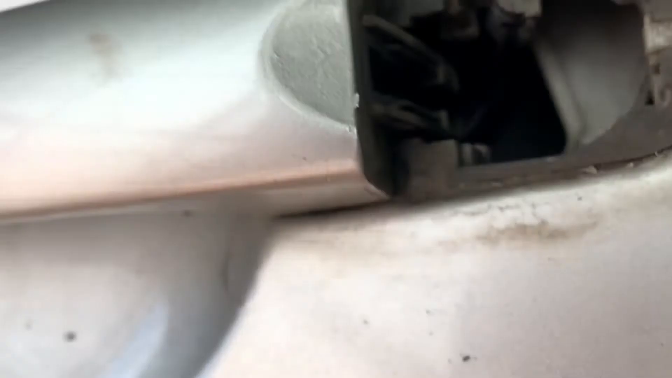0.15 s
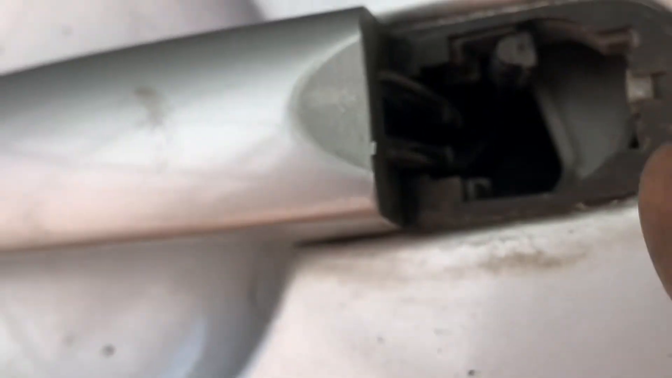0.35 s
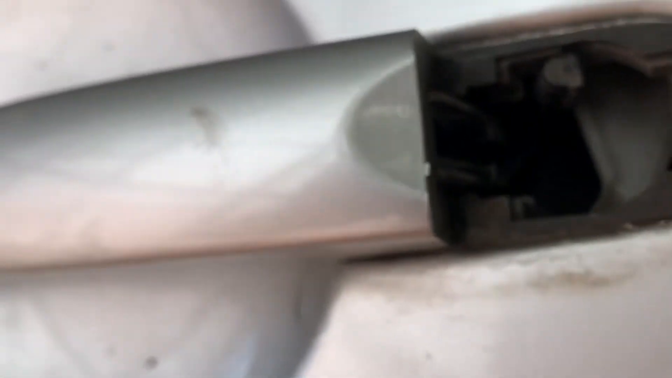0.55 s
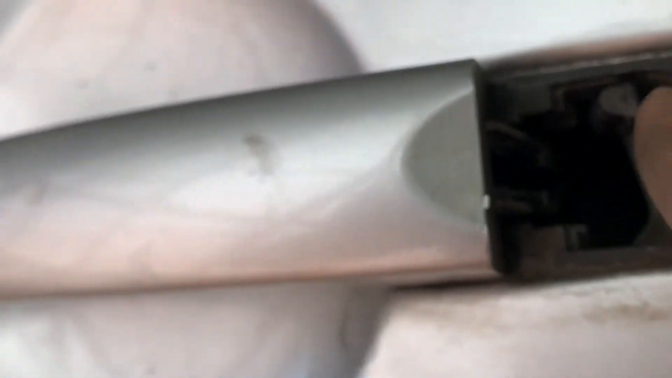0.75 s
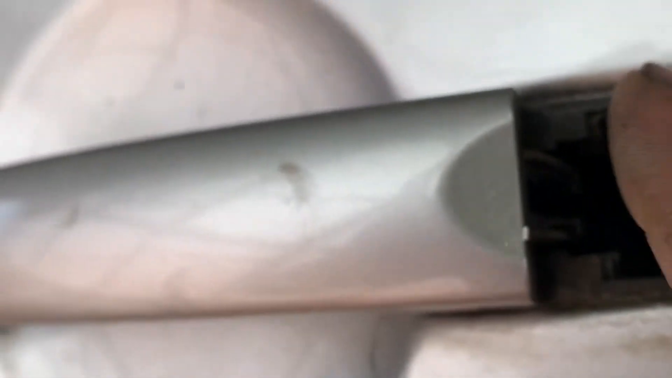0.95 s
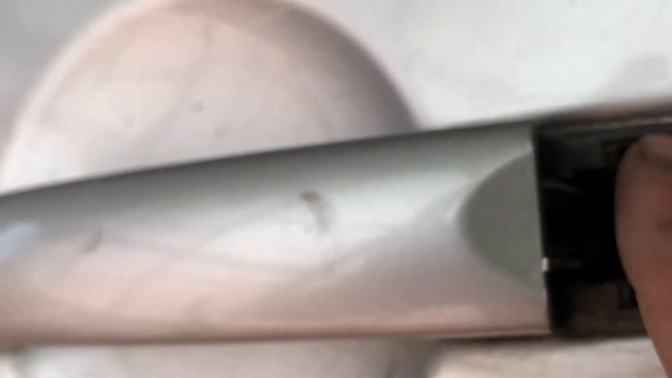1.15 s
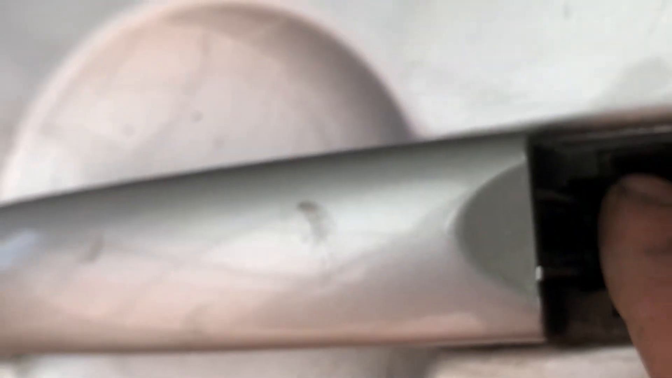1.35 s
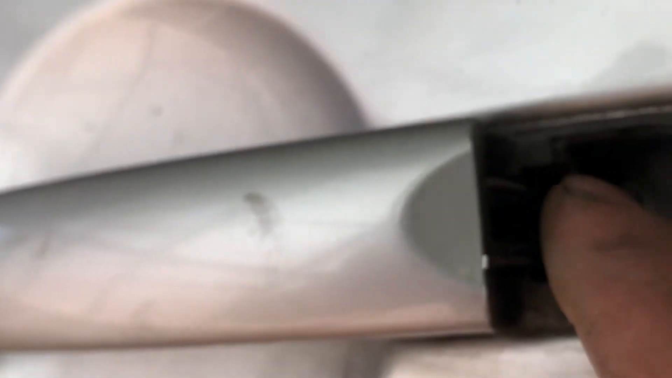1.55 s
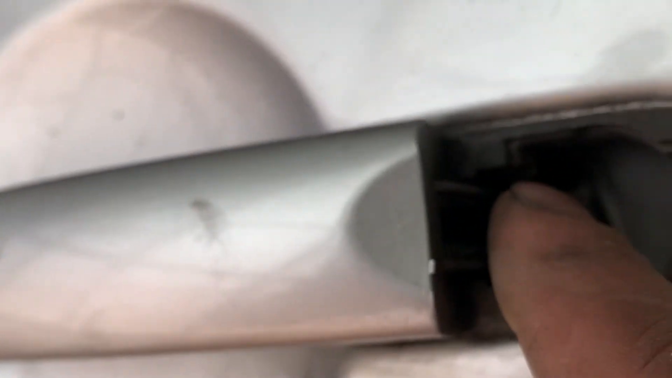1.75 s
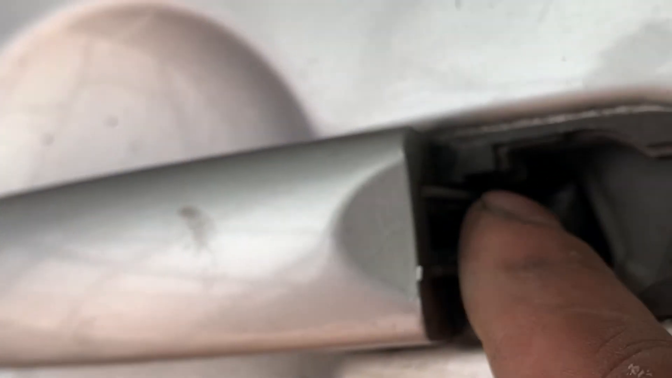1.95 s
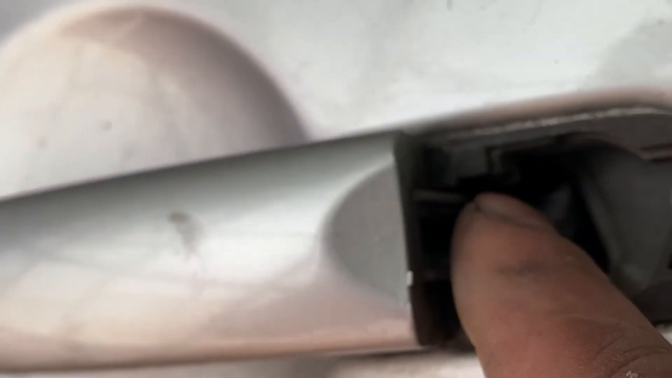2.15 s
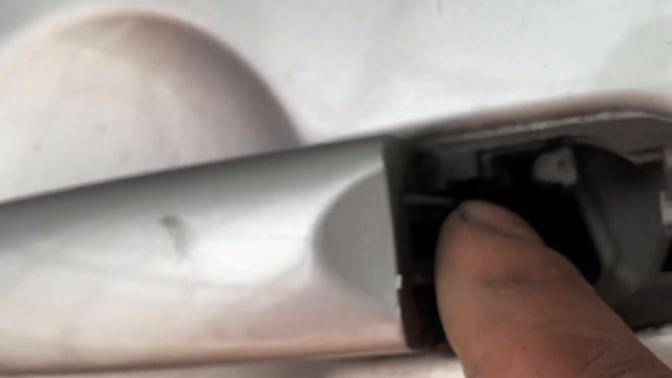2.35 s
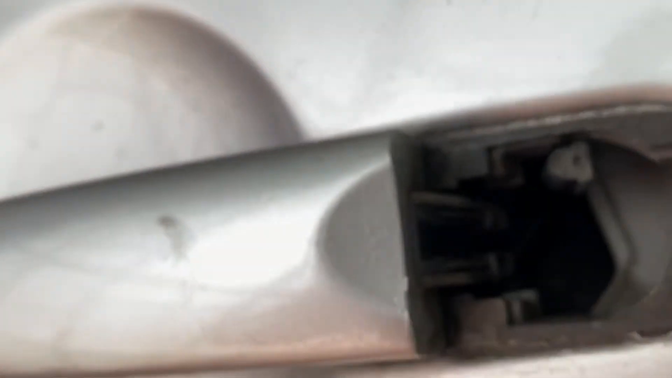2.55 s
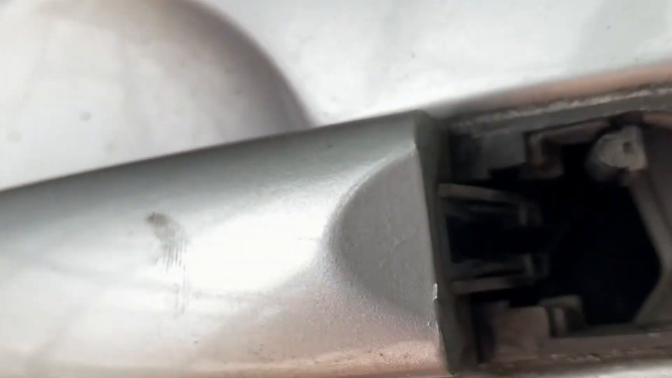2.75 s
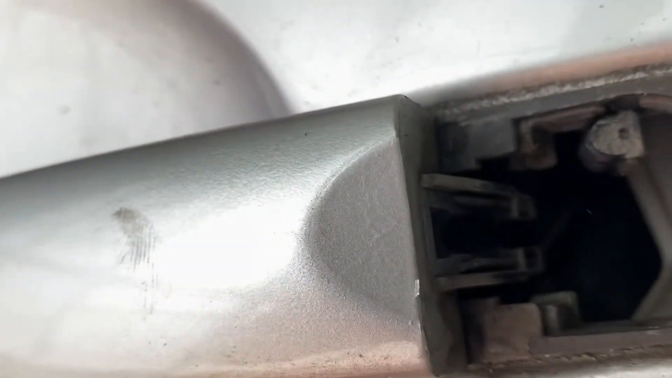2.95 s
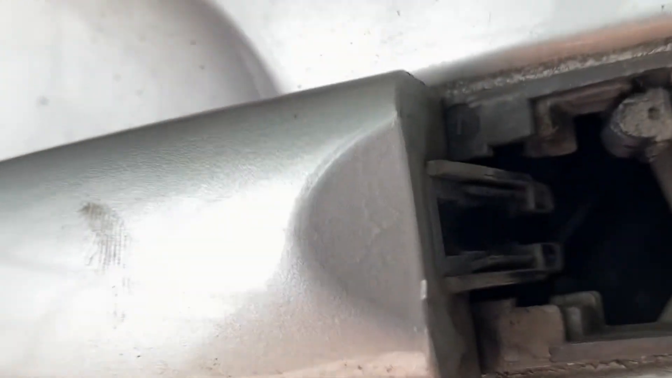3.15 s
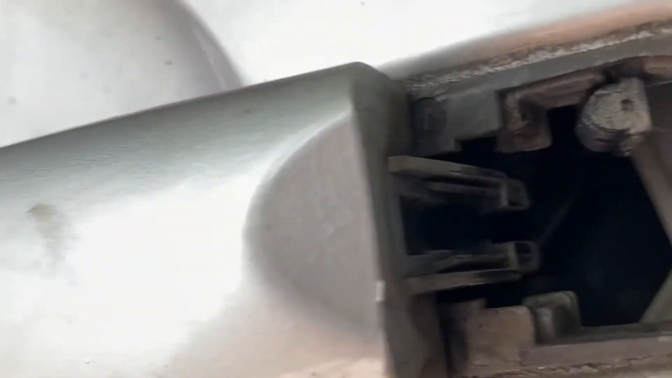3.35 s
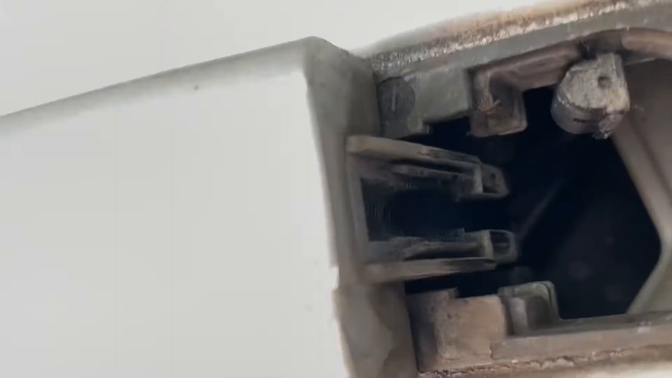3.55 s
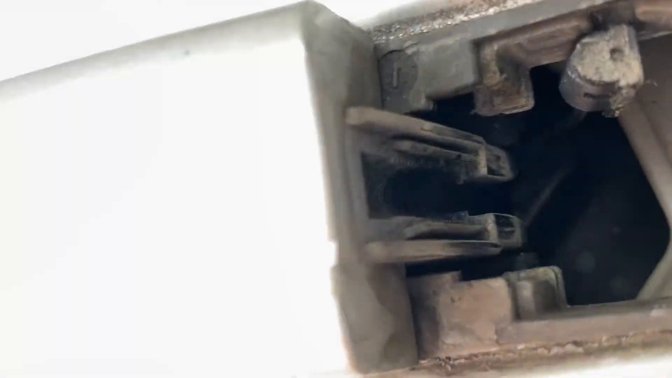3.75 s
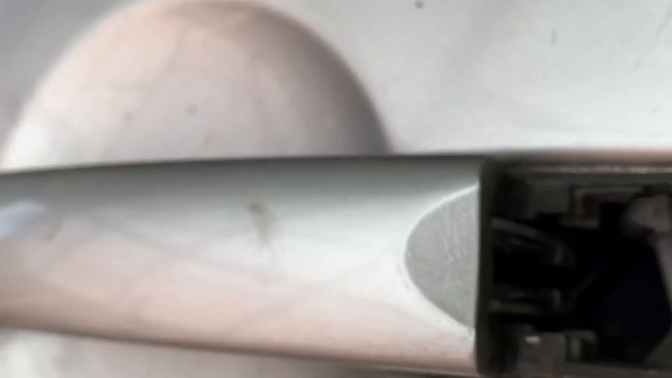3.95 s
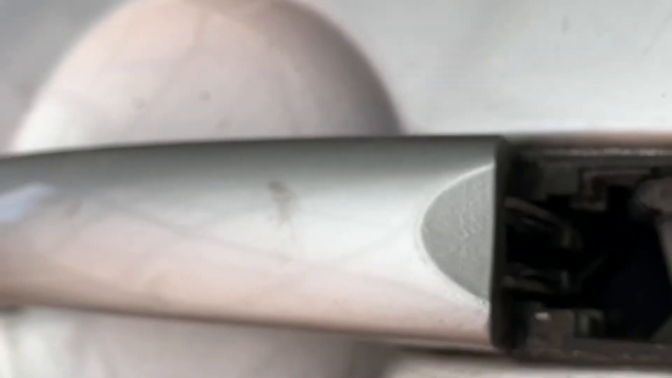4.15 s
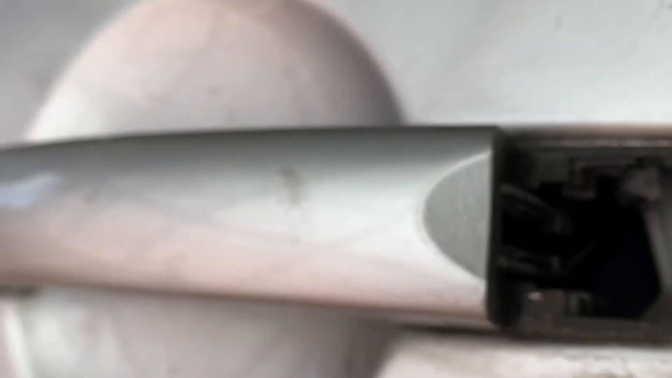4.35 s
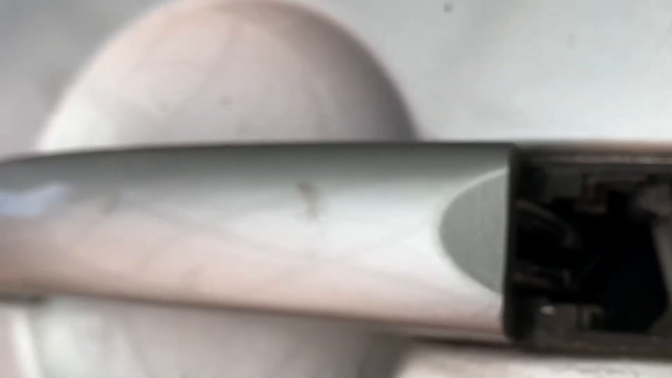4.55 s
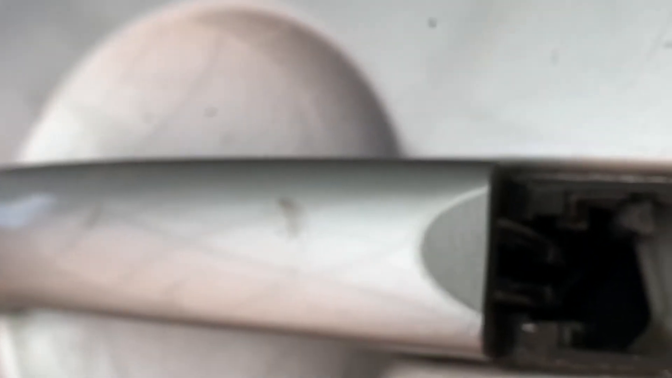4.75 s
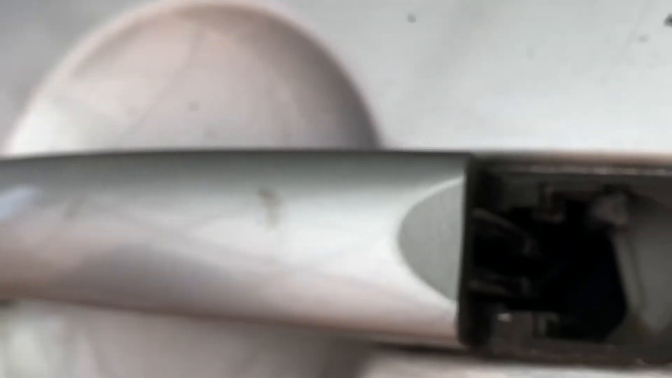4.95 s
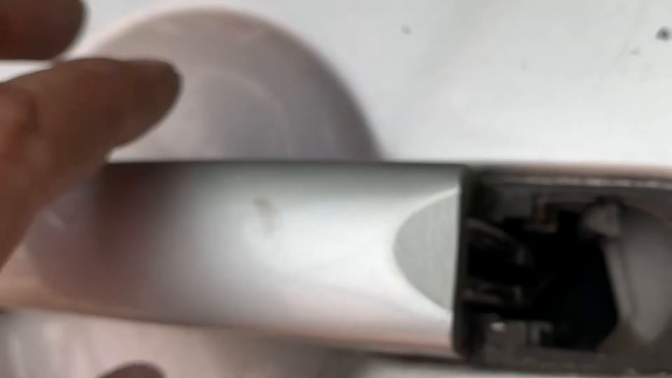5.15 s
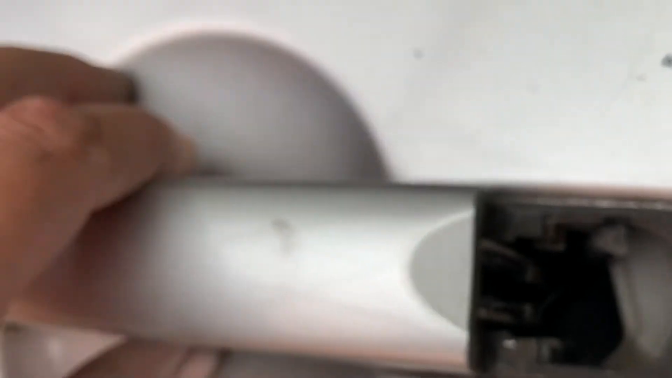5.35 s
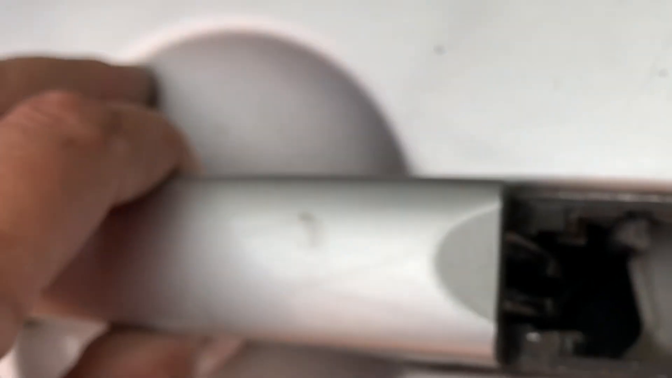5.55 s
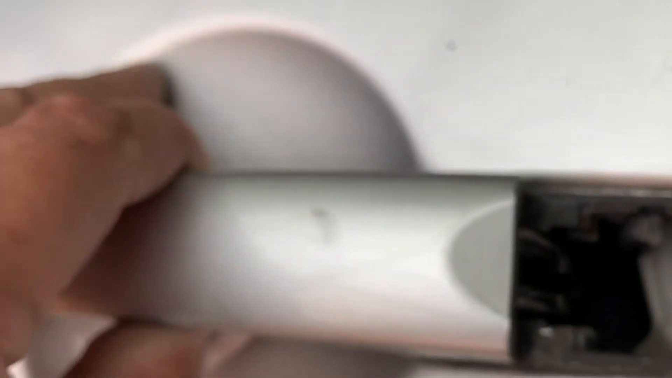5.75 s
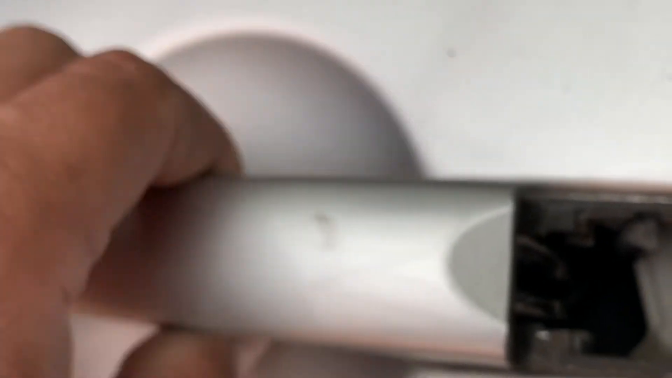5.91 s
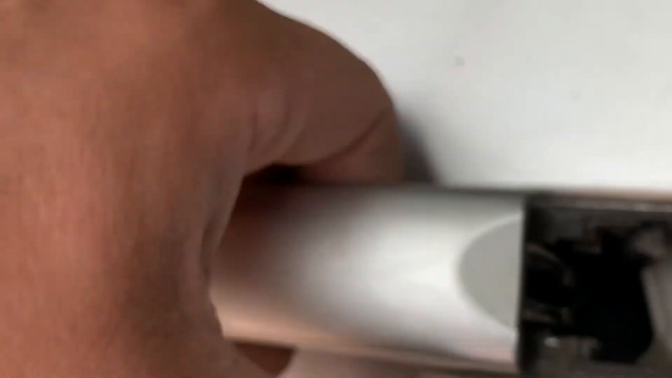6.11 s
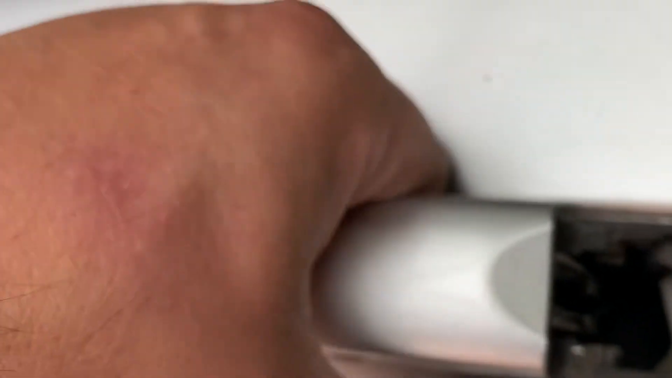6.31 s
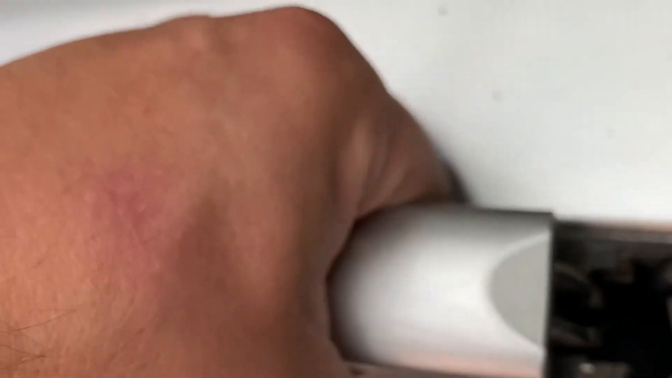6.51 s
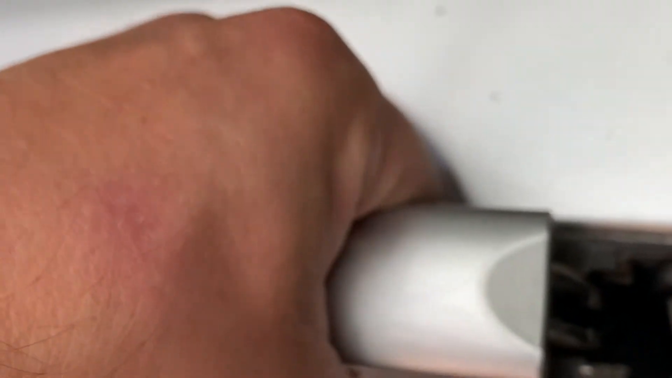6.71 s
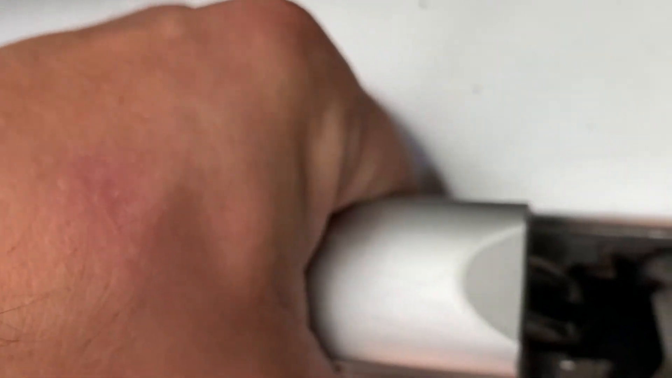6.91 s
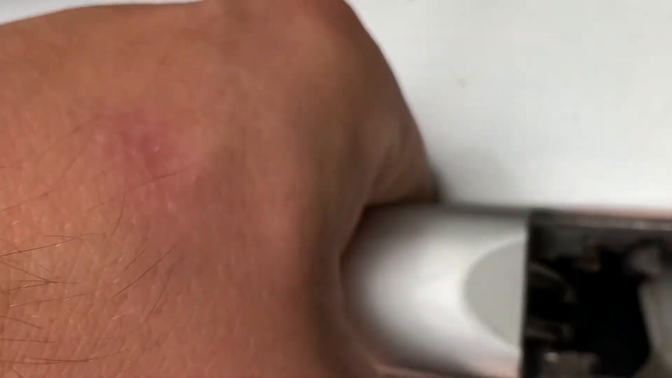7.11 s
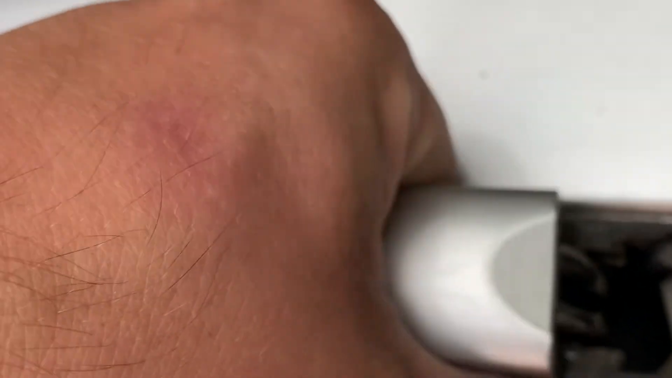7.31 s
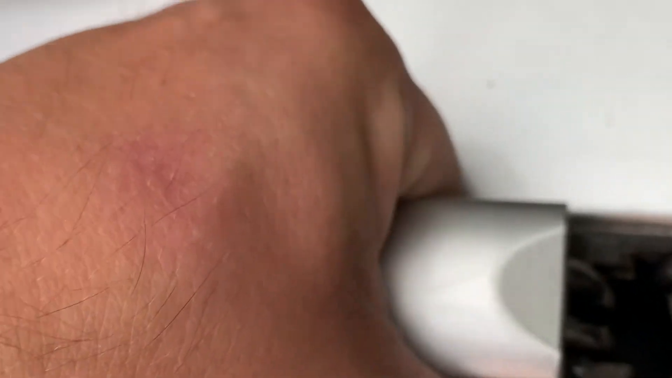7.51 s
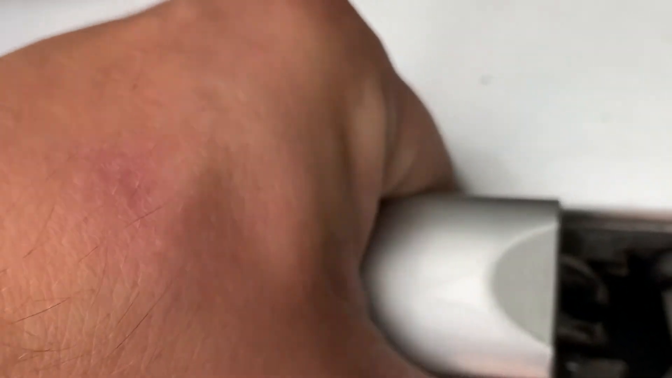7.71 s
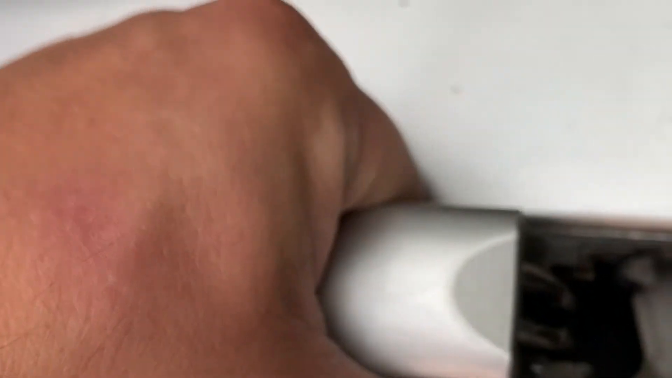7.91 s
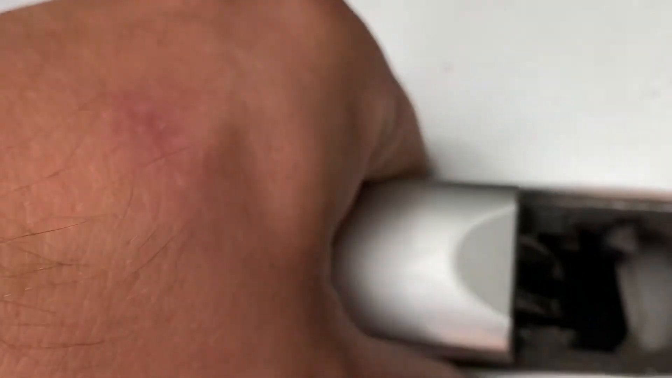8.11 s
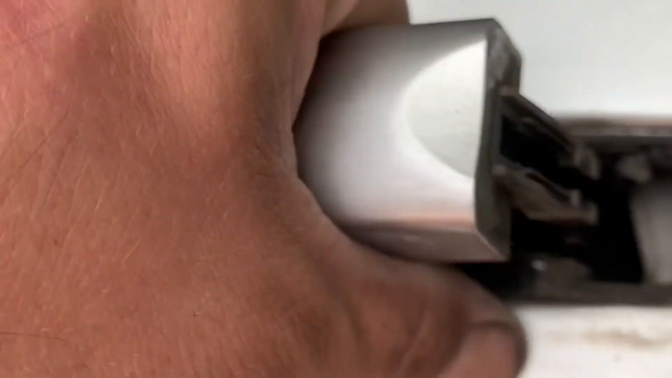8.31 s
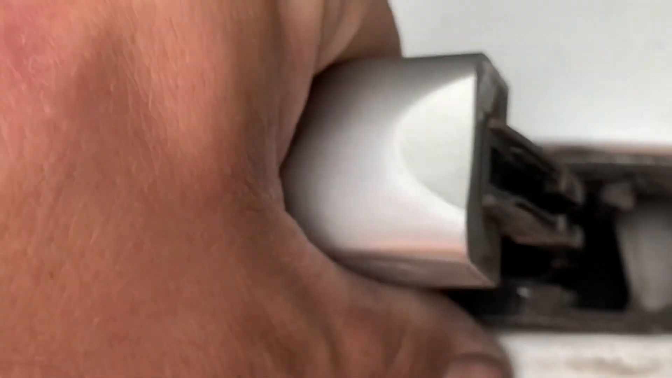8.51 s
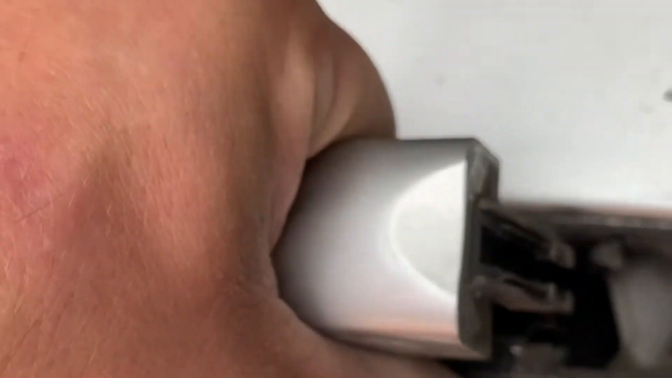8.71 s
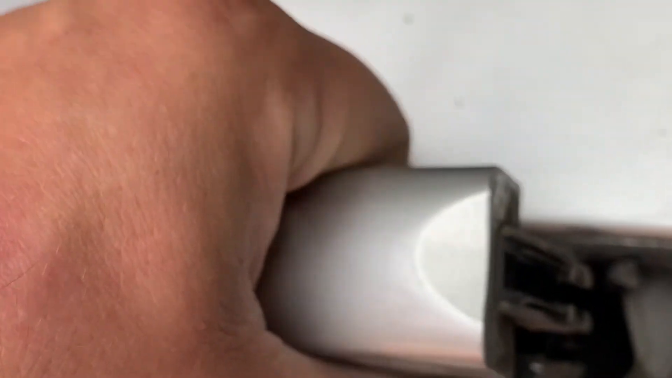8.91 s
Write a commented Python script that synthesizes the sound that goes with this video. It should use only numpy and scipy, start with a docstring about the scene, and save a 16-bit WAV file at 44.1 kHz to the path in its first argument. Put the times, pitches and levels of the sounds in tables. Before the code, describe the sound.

A close stereo pickup of a hand working a loose plastic door handle on a parked car, with cars passing behind. Faint skin scuffs and light taps come first, then a brief fade out and in, a cluster of firm boomy knocks, quieter taps, a run of crisp clicks, and one sharp rattling clack before only traffic remains.

```python
"""First a soft knock over the drone and rumble of a road, then a hand working a loose car door handle close by.
Cars pass behind: wavering sines make the engine drones, shaped noise the rumble, tyre roar and hiss.
Fingers rub and catch on the paint: dense uneven noise grains under swelling and fading levels.
Blows click in the handle and boom in the door panel: ringing modes, noise cracks and a short diffuse tail.
The whole sound fades out and in again once, briefly."""
import sys
import numpy as np
from scipy import signal
from scipy.fft import rfft, irfft, next_fast_len
from scipy.io import wavfile
from scipy.ndimage import uniform_filter1d

SR = 44100
rng = np.random.default_rng(int(sys.argv[2]) if len(sys.argv) > 2 else 0)


def master(y):
    """Save y as 16-bit WAV."""
    cut = np.clip(np.atleast_2d(y).T, -1, 1)
    pcm = np.round(cut * 32767)  # scale
    wavfile.write(sys.argv[1], SR, pcm.astype(np.int16))


N = 395577
TIME = np.arange(N) / SR
PADDED = next_fast_len(N)
BINS = np.arange(PADDED // 2 + 1) * SR / PADDED

# Road swells, points of the level curves: time_s, rumble_db, roar_db
ROAD_LEVELS = [(0, -41.5, -50.5), (1.9, -39.5, -43.5), (2.77, -46, -54.5), (3.37, -44.5, -52.5),
               (3.87, -51, -58), (4.24, -46, -55), (4.92, -43.5, -50), (5.54, -39.5, -53), (5.97, -37, -44),
               (6.94, -39, -48.5), (7.77, -40, -51), (8.37, -45, -55), (8.97, -49.5, -56.5)]
# Spectrum of the traffic noise: freq_hz, level_db_per_hz
TRAFFIC_SPECTRUM = [(15, -32.5), (32, -10), (100, -4), (125, -10.5), (250, -14), (390, -21.5), (440, -25),
                    (950, -20), (1100, -20.5), (1300, -24), (2200, -30), (2520, -29.5), (2800, -32.5),
                    (3100, -35.5), (4700, -40.5), (6000, -46.5), (16000, -62)]
# Centres of the rumble, roar and hiss bands: freq_hz
ROAD_BANDS_HZ = [242, 1020, 3200]
# Passing cars: closest_s, pitch_hz (when closest), fall_hz_per_s, level_db, swell_s, fade_s
PASSING_CARS = [(1.899, 40.77, .4, -40.5, 0.89, .9), (5.97, 48.5, 3.5, -43, 0.98, 1)]
# Higher drone, points of the pitch and level curves: time_s, pitch_hz, level_db
HIGH_DRONE = [(0, 93.8, -47), (.15, 91.4, -55), (.9, 91.1, -45.5), (1.6, 91.3, -82), (1.75, 91.7, -32),
              (1.97, 89.6, -50), (2.5, 86.9, -36), (3.1, 85.4, -39.5), (3.8, 92.2, -49), (4.9, 94, -41.5),
              (5.6, 92, -45.5), (6.0, 95.1, -39), (6.3, 97.1, -34), (6.64, 93.7, -69), (6.85, 90.7, -38.5),
              (7.57, 91.9, -59), (8.19, 88.9, -44), (8.64, 85.9, -62.5)]
HISS_DB, CLOSE_HISS_DB, CLOSE_S = -11.5, 3.5, 0.41  # hiss against roar; lift and half-span per close car
# singing tyre tread: pitch, half-width, level, loudest moment, half-span
WHINE_HZ, WHINE_WIDTH_HZ, WHINE_DB, WHINE_S, WHINE_SPAN_S = 1108, 32, -53, 0.44, .35

# Fingers sliding: loudest_s, level_db, swell_db_per_s, fade_db_per_s
RUBS = [(.44, -57, 320, 500), (1.75, -59, 81, 27.5), (3.18, -69, 49, 84), (4.25, -68, 92, 32),
        (5.83, -56, 218, 50)]
# Dry fingertips catching on an edge: start_s, level_db
CATCHES = [(0.4348, -48), (.4913, -56), (.5844, -40.5), (0.99, -47), (1.556, -54), (1.6367, -60),
           (1.687, -48), (1.7345, -52), (1.7993, -44), (1.8385, -48), (1.8756, -59), (1.925, -60),
           (1.9974, -51), (2.3105, -51), (5.87, -54), (6.05, -60)]
# Spectrum of skin on paint: freq_hz, level_db_per_hz
SKIN_SPECTRUM = [(2500, -35), (4500, -2.5), (7000, -2), (9500, -8), (13000, -8), (16000, -28.5)]
CATCH_DECAY_S = 0.013

# Blows: centre_s, panel_db, boom_hz, handle_db, ring_hz, ring_db, contact_ms, tail_db
# boom and ring move with the grip; below 0 dB the grip damps the ring
BLOWS = [(.021, -39.5, 194.5, -52, 1690, 7, 2.6, -15), (.379, -55.5, 248, -59, 1700, 22.5, 1.03, -8.5),
         (0.565, -48, 255, -43.5, 1600, 19.5, 1.34, -16), (2.1, -45.5, 250, -39, 1800, 5, 1.16, -19),
         (3.967, -22.5, 370, -27, 1760, -24, 2.43, -10.5), (3.972, -29, 343, -36, 2470, 15.5, 2.04, -11),
         (3.986, -25, 292, -40, 1210, 15.5, 3.14, -10.5), (4.005, -27.5, 266, -50, 1250, 12, 2.5, -7.5),
         (4.124, -40, 395, -74, 550, 4, 3.6, -27), (4.37, -30.5, 241.3, -73, 600, 0.5, 5.3, -12),
         (4.702, -24, 269, -56, 820, 9.5, 4, -10.5), (4.765, -41, 250, -71, 600, 7, 4.5, -12),
         (5.044, -34.5, 270, -57, 1200, 7, 2.9, -10), (5.048, -27, 273, -59.5, 850, 15.5, 5.2, -8),
         (5.147, -64, 250, -58, 3200, 2, 2.45, -6), (5.158, -36.5, 335, -54, 1110, 10, 2.33, -4),
         (5.743, -40.5, 300, -53, 350, 6, 3.2, -10), (5.801, -43.5, 250, -47.5, 3500, 0.5, 2.2, -6.5),
         (6.353, -42, 246, -52, 1250, 12.5, 3.5, -12.5), (6.864, -40.5, 248, -61.5, 4200, 18.5, 1.28, -21),
         (6.9467, -48.5, 249.9, -32, 1030, 6, 2.31, -15), (6.986, -37, 330.7, -52, 900, 9.5, 2, -8.5),
         (7.059, -60, 250, -60.5, 3500, 9.5, 1.64, -16), (7.171, -60, 250, -41, 1200, 1, 2.5, -15.5),
         (7.176, -64.5, 249, -47, 3600, 5.5, 1.17, -19.5), (7.194, -61, 250, -47.5, 3800, 5.5, 1.74, -3),
         (7.2124, -42.5, 300, -31.5, 3620, -0.5, 0.95, -20), (7.2344, -35, 250, -30.5, 3500, 6, 1.7, -15.5),
         (7.411, -59, 246, -52, 1700, -4, 0.88, -4), (7.944, -57.5, 252, -37, 1900, 6, 2.46, -10.5),
         (8.124, -39.5, 394, -23, 950, 4, 1.53, -10.5), (8.131, -35, 300, -23.5, 2340, 11, 2.12, -22),
         (8.135, -31.5, 385, -17.5, 3870, 5.5, 1.63, -17), (8.138, -33.5, 277, -30.5, 1050, 5.5, 1.85, -14),
         (8.165, -35, 455, -45.5, 650, 11, 3, -8), (8.189, -40.5, 422, -55, 600, 11, 3.1, -7.5)]
# Seven bands of a blow, blended on a log axis: centre_hz, crack_db, crack_t60_s, tail_t60_s
BLOW_BANDS = [(193, -0.5, 0.37, 0.35), (361.6, -9.5, 0.065, 0.29), (790, -5, 0.084, 0.12),
              (1620, -4, .03, 0.13), (3730, 1.5, 0.0091, 0.16), (8970, 4, 0.027, 0.18),
              (13500, 9, .012, .17)]
# Modes of door panel and handle: pitch_hz, level_db, t60_s
BODY_MODES = [(139, 3, 0.25), (185.7, -2.5, 0.32), (236.5, 4.5, 0.15), (291.2, 2, 0.13), (358.2, 1.5, 0.13),
              (485, -2, 0.068), (624, -6, 0.13), (792, -7, 0.11), (994, -5, 0.077), (1153, -6.5, 0.11),
              (1520, -6, 0.015), (1934, -6.5, 0.092), (2120, -3.5, 0.069), (2344, -3.5, 0.026),
              (2830, -3.5, 0.079), (3478, -8, 0.076), (3960, -17.5, 0.13), (4700, -14, 0.03)]
# Boom of the door panel: freq_hz, level_db
PANEL_BOOM = [(200, 0.5), (353, 0.5), (770, -0.5), (1670, -29), (13500, -68)]
# Click of the handle: freq_hz, level_db
HANDLE_CLICK = [(200, -16), (353, -6), (770, 2.87), (3700, 0.2), (8970, -10.5), (13500, -22.5)]
# Brightening of the click each time the contact halves: freq_hz, change_db
CLICK_BRIGHTENING = [(200, -19), (770, -5.5), (1670, 1), (3700, 5.5), (8970, 18), (13500, 29.5)]
# The hand drifts from the left towards the centre, points of the pan curve: time_s, left_minus_right_db
HAND_DRIFT = [(.38, 9.5), (2.1, 1.5), (6.9, 2), (8.14, 1.5)]
EVEN_CONTACT_MS = 1.91  # contact that gives the boom and click spectra unchanged
PANEL_TILT_DB_PER_OCTAVE = 6  # dulling of the boom each time the contact doubles past that
BLOW_SAMPLES = 18000
LEAD_ROOM = 64  # samples of room for the channel that leads
SWING_CYCLES, CRACK_CYCLES = 4.1, 1.86  # cycles a mode and a crack take to build, so the lows come late
BED_DB = -17.5  # flat bed between the body resonances
SNAP_DB, SNAP_CYCLES = 1, 1.4  # clean snap at the pitch of the ring: level, cycles to peak
THUMP_DB, THUMP_CYCLES = -2, 3.2  # panel swing at the pitch of the boom: level, cycles to swell
RECESS_DB = 3.5  # tail from the recess itself against the part from all round
LINGER_DB, LINGER = -17.5, 2.44  # weaker, slower second stage of the tail: level, times as long
RING_Q, BOOM_Q, BOOM_DB = 6.6, 2.13, 2.5  # sharpness of ring and boom; lift of the boom
PLACE_SPREAD = 0.07  # relative shift of the stereo pattern from blow to blow

# Likeness of left and right for sound from all round: freq_hz, likeness (no unit, 1 is identical)
LEFT_RIGHT_LIKENESS = [(60, 0.97), (130, 0.84), (290, 0.54), (640, -0.11), (1400, 0.0059)]
# Stereo phase and balance of near sound: freq_hz, left_lead_rad, left_minus_right_db
NEAR_STEREO = [(0, -0.36, 1.9), (400, 0.62, -2.1), (990, 0.2, -0.3), (1900, 1.68, -2.5), (2800, 3.5, -10),
               (5810, 11.5, 0), (6100, 11, -5), (15880, -4, 2.5)]
# Treble colour of the whole sound: freq_hz, level_db
TREBLE_COLOUR = [(5000, -1.5), (7000, -7.5), (9500, -1), (10800, -2), (11500, -19), (12500, -2.5),
                 (15000, -11.5), (16000, -23.5)]
TOP_HZ = 16200
DIP_S, DIP_DB, DIP_WIDTH_S = 3.882, -28.5, 0.011  # the brief fade: centre, depth, half-width


def undb(db):
    """Decibels to gain."""
    return 10 ** (np.asarray(db) / 20)


def read(table, hz):
    """A spectrum read on a log-frequency axis."""
    points, value = np.transpose(table)
    return np.interp(np.log(np.maximum(hz, 1)), np.log(points), value)


def shares(centres_hz, hz):
    """Overlapping triangles on a log axis, one for each centre; they add up to 1."""
    return [read(np.transpose([centres_hz, one]), hz) for one in np.eye(len(centres_hz))]


def curves(table):
    """Every column of a table, drawn over time."""
    s, *columns = np.transpose(table)
    return [np.interp(TIME, s, column) for column in columns]


def walk(rate):
    """Random levels held for 1 / rate s and smoothed twice."""
    hold = int(SR / rate)
    steps = np.repeat(rng.standard_normal(N // hold + 1), hold)
    return uniform_filter1d(uniform_filter1d(steps, hold), hold)[:N]


def unit(x):
    """Scaled to rms 1."""
    return x / x.std()


def decay(t, t60):
    """Exponential decay that falls 60 dB in t60 seconds."""
    return np.exp(-np.log(1000) * t / t60)


def lift(hz, centre_hz, db, q):
    """A resonance that raises or damps one band."""
    detune = 1j * q * (hz / centre_hz - centre_hz / hz)
    return (undb(db) + detune) / (1 + detune)


def near_stereo(hz):
    """Complex gain of near sound in the left and right channel."""
    points, lead, tilt_db = np.transpose(NEAR_STEREO)
    way = np.array([[.5], [-.5]])
    return undb(way * np.interp(hz, points, tilt_db)) * np.exp(1j * way * np.interp(hz, points, lead))


def diffuse(size, hz):
    """Spectra of noise from all round: alike left and right in the bass only."""
    alike = read(LEFT_RIGHT_LIKENESS, hz)
    mid, side = rfft(rng.standard_normal((2, size))) * np.sqrt([1 + alike, 1 - alike])
    return np.array([mid + side, mid - side])


def drone(hz, db, waver, throb_db):
    """An engine order whose pitch wavers and whose level throbs."""
    phase = 2 * np.pi * np.cumsum(hz * (1 + waver * walk(12))) / SR
    throb = np.minimum(walk(22) + 0.4 * walk(8), .6)
    stereo_sway = np.array([[.1], [-.1]]) * walk(3.6)
    return np.sqrt(2) * undb(db + throb_db * throb) * np.sin(phase + stereo_sway)


def engines():
    """A higher drone, plus one for each passing car that swells, fades and steadily sinks in pitch."""
    out = drone(*curves(HIGH_DRONE), 0.0462, 8.4)
    for s, hz, fall, db, swell_s, fade_s in PASSING_CARS:
        away = (TIME - s) / np.where(TIME < s, swell_s, fade_s)
        out = out + drone(hz - fall * (TIME - s), db, 0.0517, 6.3) / (1 + away ** 2)
    return out


def tread_whine(far):
    """Tyre tread sings: a narrow band of the road noise swells once and flutters."""
    tread = unit(irfft(far / (1 + ((BINS - WHINE_HZ) / WHINE_WIDTH_HZ) ** 2), PADDED)[:, :N])
    swell = 1 / (1 + ((TIME - WHINE_S) / WHINE_SPAN_S) ** 4)
    return undb(WHINE_DB + 4.5 * walk(15)) * tread * swell


def road():
    """Passing cars: bands of diffuse noise swell as rumble and roar, hiss follows the roar, engines drone."""
    far = diffuse(PADDED, BINS) * undb(read(TRAFFIC_SPECTRUM, BINS))
    bands = shares(ROAD_BANDS_HZ, BINS)
    rumble, roar, hiss = (unit(irfft(far * share, PADDED)[:, :N]) for share in bands)
    rumble_db, roar_db = curves(ROAD_LEVELS)
    close = sum(1 / (1 + ((TIME - car[0]) / CLOSE_S) ** 2) for car in PASSING_CARS)
    hiss_db = roar_db + HISS_DB + CLOSE_HISS_DB * close
    tyres = undb(roar_db + 1.1 * walk(20)) * roar + undb(hiss_db + 1.9 * walk(30)) * hiss
    return undb(rumble_db + 2.0 * walk(11)) * rumble + tyres + tread_whine(far) + engines()


def fingers():
    """Skin slips over paint in dense tiny grains of uneven size, in patches, and catches on edges."""
    rubbing = 0
    for s, db, swell, fade in RUBS:
        rubbing = rubbing + undb(db - np.abs(TIME - s) * np.where(TIME < s, swell, fade))
    catching = 0
    for s, db in CATCHES:
        since = np.maximum(TIME - s, 0) / CATCH_DECAY_S
        catching = catching + undb(db) * (1 - np.exp(-8 * since)) * np.exp(-since)
    grains = rng.standard_normal(PADDED) * undb(3.74 * rng.exponential(size=PADDED))
    skin = unit(irfft(rfft(grains) * undb(read(SKIN_SPECTRUM, BINS)), PADDED))
    near = rfft(skin) * near_stereo(BINS)
    out = 0
    # dull, bright and very bright slips come and go on their own
    for share in shares([5000, 9500, 13500], BINS):
        band = irfft(near * share, PADDED)[:, :N]
        patches = undb(4.5 * walk(40) + 4.0 * walk(200))
        out = out + band * (rubbing * patches + catching * undb(1.0 * walk(24.3)))
    return out


def colour(hz, panel_db, handle_db, contact_ms):
    """Level in dB at each frequency: a short contact brightens the click, a long one dulls the boom."""
    halvings = np.log2(EVEN_CONTACT_MS / contact_ms)
    click_db = handle_db + read(HANDLE_CLICK, hz) + halvings * read(CLICK_BRIGHTENING, hz)
    tilt_db = min(halvings, 0) * PANEL_TILT_DB_PER_OCTAVE * np.log2(hz / PANEL_BOOM[0][0])
    boom_db = panel_db + read(PANEL_BOOM, hz) + tilt_db
    return 20 * np.log10(np.hypot(undb(boom_db), undb(click_db)))


def body_bands(bins):
    """Band filters through the body: a resonance at every mode over a flat bed."""
    bands = np.array(shares(np.transpose(BLOW_BANDS)[0], bins)) * (bins > 110) / np.sqrt(bins + 1)
    hz, db, t60 = np.transpose(BODY_MODES)[..., None]
    peaks = undb(db) / np.sqrt(1 + ((bins - hz) * t60 / 4.8) ** 2)
    bands = bands * np.sqrt(undb(BED_DB) + np.sum(peaks ** 2, axis=0))
    power = 2 * np.sum(bands ** 2, axis=1, keepdims=True)
    return bands * np.sqrt(BLOW_SAMPLES / power)  # rms 1 on noise


def body_ringing(t, contact_s, band_db):
    """Modes ring with new weights and slightly new pitches, each swinging up over a few cycles."""
    hz, db, t60 = np.transpose(BODY_MODES)[..., None]
    weight_chance, pitch_chance = rng.standard_normal((2, len(hz), 1))
    centre_hz = np.transpose(BLOW_BANDS)[0][:, None]
    weight = undb(read(np.hstack([centre_hz, band_db]), hz) + db + 2.3 * weight_chance)
    swing = (1 - np.exp(-t / (contact_s / 4 + SWING_CYCLES / hz))) ** 2
    tones = np.sin(2 * np.pi * hz * (1 + 0.012 * pitch_chance) * t)
    return np.sum(weight * swing * decay(t, t60) * tones, axis=0)


def snap(t, contact_s, ring_hz, level_db):
    """First clean snap of the contact: a short sine burst at the pitch of the ring."""
    cycles = ring_hz * np.maximum(t - contact_s / 2, 0) / SNAP_CYCLES
    return undb(level_db + SNAP_DB) * np.sin(2 * np.pi * ring_hz * t) * cycles * np.exp(1 - cycles)


def thump(t, boom_hz, panel_db):
    """The panel gives under the blow and swings at the pitch of the boom."""
    swings = boom_hz * t / THUMP_CYCLES
    return undb(panel_db + THUMP_DB) * np.sin(2 * np.pi * boom_hz * t) * swings * np.exp(1 - swings)


def crack(t, contact_s, band_db, bands):
    """Noise swells and dies over the contact, no faster than a cycle or two, then each band rings out."""
    centre_hz, crack_db, crack_t60, _ = np.transpose(BLOW_BANDS)[..., None]
    touch = t / (contact_s + CRACK_CYCLES / centre_hz)
    touch = np.minimum(touch, touch ** 2)  # a rounded start
    shape = touch * np.exp(1 - touch) + 0.38 * np.minimum(touch, 1) * decay(t, crack_t60)
    noise = irfft(rfft(rng.standard_normal(len(t))) * bands)
    return np.sum(undb(band_db + crack_db) * noise * shape, axis=0)


def tail(t, bins, near, tail_db, band_db, bands):
    """Noise returns from recess and ground a moment late, from all round."""
    t60 = np.transpose(BLOW_BANDS)[3][:, None]
    fading = decay(t, t60) + undb(LINGER_DB) * decay(t, LINGER * t60)
    recess = undb(RECESS_DB) * rfft(rng.standard_normal(len(t))) * near
    around = (diffuse(len(t), bins) / np.sqrt(2) + recess)[:, None]
    late = undb(tail_db) * (1 - np.exp(-t / 0.0036))
    return late * np.sum(undb(band_db) * irfft(around * bands) * fading, axis=1)


def blows():
    """Every blow rings the body, thumps, cracks, mostly snaps, and leaves a tail, coloured by ring and boom."""
    t = np.arange(BLOW_SAMPLES) / SR
    bins = np.arange(BLOW_SAMPLES // 2 + 1) * SR / BLOW_SAMPLES + 1e-3  # offset avoids dividing by 0
    bands = body_bands(bins)
    centre_hz = np.transpose(BLOW_BANDS)[0][:, None]
    out = np.zeros((2, N + BLOW_SAMPLES))
    for s, panel_db, boom_hz, handle_db, ring_hz, ring_db, contact_ms, tail_db in BLOWS:
        contact_s = contact_ms / 1000
        band_db = colour(centre_hz, panel_db, handle_db, contact_ms)
        direct = body_ringing(t, contact_s, band_db) + thump(t, boom_hz, panel_db)
        direct += crack(t, contact_s, band_db, bands)
        if ring_db > 0:  # a damped ring has no snap
            direct += snap(t, contact_s, ring_hz, colour(ring_hz, panel_db, handle_db, contact_ms))
        # each blow has a slightly different stereo pattern
        near = near_stereo(bins * (1 + PLACE_SPREAD * rng.standard_normal()))
        around = tail(t, bins, near, tail_db, band_db, bands)
        ring = lift(bins, ring_hz, ring_db, RING_Q) * lift(bins, boom_hz, BOOM_DB, BOOM_Q)
        direct, around = np.roll(direct, LEAD_ROOM), np.roll(around, LEAD_ROOM, axis=1)
        sound = irfft((rfft(direct) * near + rfft(around)) * ring)
        pan_db = np.interp(s, *np.transpose(HAND_DRIFT))
        at = int((s - contact_s / 2) * SR) - LEAD_ROOM
        out[:, at:at + BLOW_SAMPLES] += sound * undb(np.array([[pan_db], [-pan_db]]) / 2)
    return out[:, :N]


def scene():
    """Road behind, fingers and blows close by."""
    return road() + fingers() + blows()


def record(dry):
    """The treble is coloured and the loudest peaks rounded; one brief fade out and in; the top is cut."""
    heard = irfft(rfft(dry, PADDED) * undb(read(TREBLE_COLOUR, BINS)), PADDED)[:, :N]
    rounded = heard / (1 + (heard / .9) ** 4) ** .25
    faded = rounded * undb(DIP_DB / (1 + ((TIME - DIP_S) / DIP_WIDTH_S) ** 2))
    top_cut = signal.ellip(8, .2, 70, TOP_HZ, fs=SR, output="sos")
    return signal.sosfilt(top_cut, faded)


dry = scene()
out = record(dry)
master(out)
```